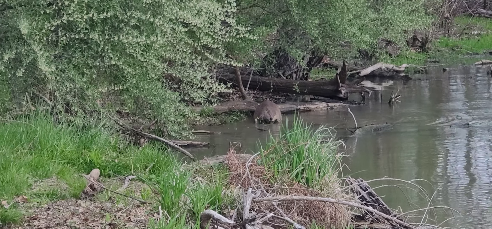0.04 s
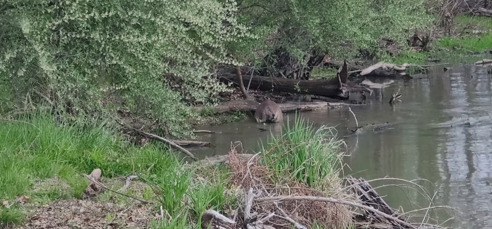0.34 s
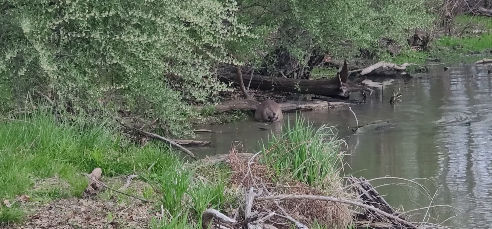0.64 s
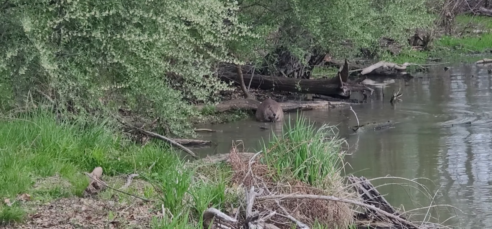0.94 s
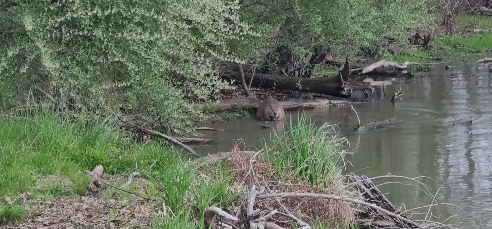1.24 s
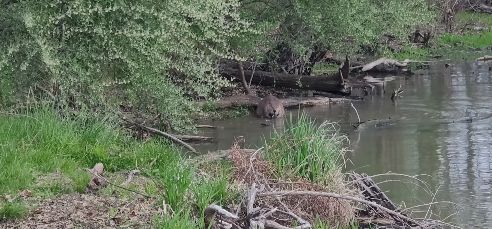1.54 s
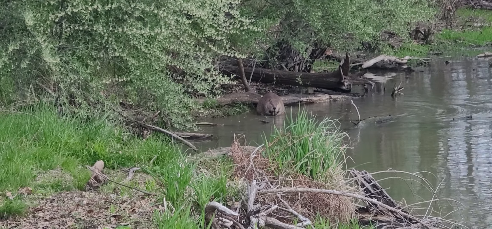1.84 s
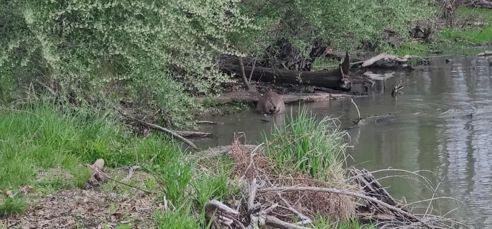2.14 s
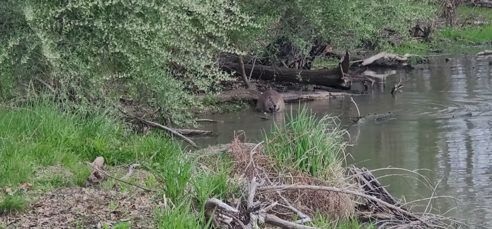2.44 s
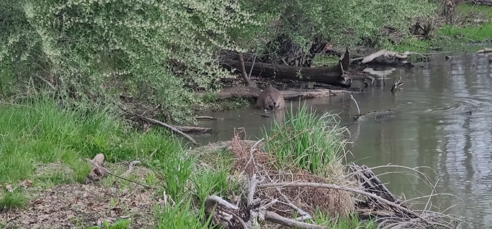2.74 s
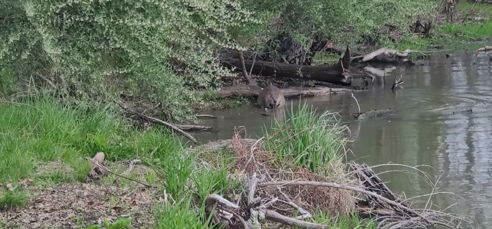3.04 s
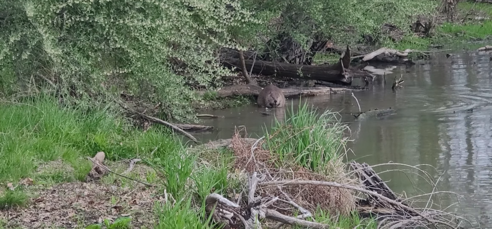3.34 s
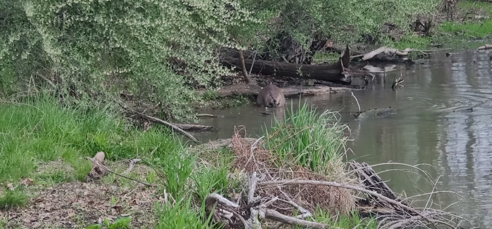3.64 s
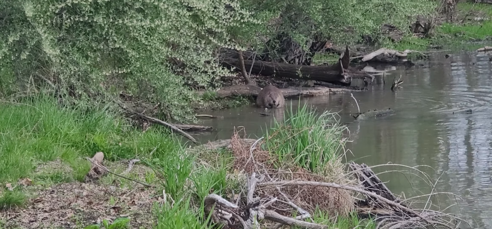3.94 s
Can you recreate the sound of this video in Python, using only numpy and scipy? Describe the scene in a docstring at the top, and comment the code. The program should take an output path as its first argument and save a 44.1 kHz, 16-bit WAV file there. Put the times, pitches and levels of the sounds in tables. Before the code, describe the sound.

Beaver teeth crack wood in quick little bites, with rumbling wind and birds around.

```python
"""A beaver gnaws on the far bank of a quiet river: about seven crisp bites a second, each a double
crack of wood fibre. A dove coos three times in near-pure tones, a songbird whistles and chirps, and
the banks give them all a short echo. Behind them sit far birds and a soft wash of water and leaves,
while wind buffets the two microphone ports with low rumble. Near the end a small camera motor,
probably the zoom, starts to whine on the left."""
import sys
import numpy as np
from scipy import signal
from scipy.fft import rfft, irfft
from scipy.io import wavfile
from scipy.ndimage import uniform_filter1d

SR = 44100
rng = np.random.default_rng(int(sys.argv[2]) if len(sys.argv) > 2 else 0)


def int16_out(signal):
    """Quantize to a 16-bit WAV file."""
    q = np.round(np.clip(np.atleast_2d(signal).T, -1, 1) * 32767)
    wavfile.write(sys.argv[1], SR, q.astype(np.int16))


N = 176400

# Bites: (time [s], level [dB], gap to second crack [s], second crack against first [dB],
# treble tilt [dB/octave], wood ring [Hz])
BITES = [(0.666, -51.5, 0.0026, -19, -1, 4400), (0.9102, -51.5, 0.005, -11, -5, 2680),
         (1.052, -60.5, .0015, 4, -3, 4270), (1.1898, -54, 0.0062, -6, -2, 4900),
         (1.337, -57.5, 0.0049, -1, -3, 3880), (1.5237, -62, 0.0075, -1, 1.5, 4930),
         (1.656, -64.5, .0075, 2, -5, 4540), (1.987, -57, .0028, -2, -1, 5000),
         (2.1238, -58, 0.0037, -7, 0, 4540), (2.3002, -54, 0.0068, -13, -3.5, 5370),
         (2.4428, -60, 0.0025, -6, 1, 5300), (2.5628, -58, 0.0067, 2, -1, 4900),
         (2.7085, -52, 0.0013, -14, 0, 5600), (2.8452, -53.5, 0.0055, -6, 0, 5500),
         (3.023, -61.5, 0.0073, -6, -3, 5800), (3.171, -61, 0.0026, -4, -3, 6040),
         (3.3027, -62.5, 0.0035, -4, 1, 5570)]
# Tone of a snapping fibre: (frequency [Hz], relative level [dB])
CRACK_EQ = [(500, -22), (1200, -10), (2200, -5), (3200, 2), (4200, -2), (5500, -2), (6800, -5), (8000, -20),
            (9500, -22), (11200, -16.5), (15500, -19)]
CRACK_RISE_S, CRACK_DECAY_S, SPLINTER_DECAY_S, SPLINTER_DB = 0.00017, 0.00086, 0.0054, -10
RING_DB, RING_WIDTH_HZ = 6.5, 510
BITE_PAN_DB, BITE_ECHO_DB = 6, -8  # every pan is left minus right

# Coos: (start [s], hold [s], pitch [Hz], level [dB], tail peak after the hold [s])
COOS = [(.05, 0.27, 494, -53, 0.088), (1.155, .27, 492, -53, 0.093), (2.035, 0.251, 486, -55, 0.12)]
COO_RISE_S, COO_FALL_S, COO_SAG_HZ_PER_S, COO_DROP_HZ = 0.073, 0.059, 13.4, 3.96
COO_TAIL_DB, COO_TAIL_S, COO_TAIL_SAG_HZ_PER_S, COO_ECHO_DB = -9.5, 0.058, 98, -14

# The songbird's falling whistle: (time [s], pitch [Hz], level [dB])
WHISTLE = [(1.36, 3600, -95), (1.44, 3200, -79), (1.485, 2990, -63.5), (1.53, 2670, -73),
           (1.555, 2600, -69), (1.585, 2380, -66), (1.62, 2120, -64.5), (1.65, 1970, -67)]
# Its chirps: (start [s], length [s], first pitch [Hz], last pitch [Hz], level [dB])
CHIRPS = [(1.903, 0.055, 3220, 3170, -71.5), (2.17, 0.063, 2130, 2540, -68.5),
          (2.214, 0.064, 2780, 2940, -70), (2.219, 0.058, 3160, 3140, -70.5),
          (2.403, 0.035, 2370, 2520, -77), (2.521, 0.03, 2250, 2510, -73), (2.586, 0.032, 2320, 2540, -74),
          (2.77, 0.032, 2280, 2450, -75.5), (2.942, 0.057, 2230, 2400, -76),
          (3.193, 0.078, 2450, 2193, -72), (3.654, 0.1, 5800, 6070, -85)]
BIRD_PAN_DB, BIRD_ECHO_DB = 7, -7

# Thin, buzzy calls: (centre [s], half length [s], pitch [Hz], width [Hz], level [dB], pan [dB])
LISPS = [(1.905, 0.033, 8500, 700, -89, 5), (3.212, .025, 6800, 600, -77, 1),
         (3.915, .035, 6300, 650, -73, -9)]
# Swells of a bird chorus blurred by distance: (time [s], level [dB])
CHORUS_FADER = [(0, -78.5), (.7, -84), (.9, -71), (1.15, -77), (1.8, -76.5), (2.1, -81.5), (2.9, -78.5),
                (3.3, -72), (3.7, -73), (4.0, -71.5)]
CHORUS_HZ, CHORUS_WIDTH_HZ, CHORUS_FLUTTER_DB = 2137, 220, 3

# Tone of the motor's hiss: (frequency [Hz], relative level [dB])
MOTOR_HISS_EQ = [(200, 10.5), (600, 11.5), (1400, 5.5), (3000, -8), (5000, -27), (7200, -11), (7900, 1),
                 (8400, -6), (9200, -43), (11000, -32), (15500, -17)]
MOTOR_START_S, MOTOR_RISE_S, MOTOR_HISS_DB, MOTOR_PAN_DB = 3.48, 0.049, -62, 34
WHINE_HZ, WHINE_DB = 7880, -74

# Gusts on the ports: (time [s], level [dB], pan [dB])
GUSTS = [(0, -17.5, -1), (.08, -37, -2.5), (.18, -36.5, -10), (.29, -42, -2), (.40, -34, -5),
         (.55, -46.5, -8.5), (.72, -38.5, -6.5), (.92, -41, -8), (1.0, -46.5, 6.5), (1.6, -48, 2),
         (1.77, -39, 8), (1.92, -42.5, -1.5), (2.2, -38.5, -7), (2.5, -46, -10.5), (2.75, -37.5, -5.5),
         (3.07, -44.5, -6), (3.2, -42.5, -9), (3.45, -45.5, -1.5), (4.0, -45.5, -1.5)]
# Tone of the wind rumble: (frequency [Hz], relative level [dB])
RUMBLE_EQ = [(10, -17.5), (25, -5.5), (40, 0), (62, -3.5), (80, -2.5), (100, -11), (130, -20), (200, -31),
             (400, -45.5), (1000, -97)]
# Single wind thumps: (centre [s], half length [s], pitch [Hz], left level [dB], right level [dB])
BUFFETS = [(.02, .028, 66.6, -11, -26), (0.168, 0.023, 67, -39, -31), (.40, 0.021, 72.2, -33, -28.5),
           (0.683, 0.017, 56.6, -29.5, -26.5), (0.759, 0.014, 56.5, -34, -17.5),
           (1.788, 0.026, 71, -34, -37), (2.944, 0.01, 58, -35, -21), (3.739, 0.017, 69.4, -45, -33)]

# Tone of the river and distant woods: (frequency [Hz], relative level [dB])
RIVER_EQ = [(88, -31), (150, -2.5), (221, -7), (320, -8.5), (462, -11), (736, -11), (1000, -20),
            (1370, -17.5), (1830, -22), (2180, -20), (2500, -25.5), (3040, -20), (3690, -30.5), (6110, -30),
            (6730, -31.5), (7560, -46.5), (9540, -49), (11100, -45), (15500, -45.5)]
# Slow swell of the wash: (time [s], level before RIVER_GAIN_DB [dB])
RIVER_FADER = [(0.1, -71.5), (0.47, -72.5), (3.41, -71.5), (3.55, -71), (3.95, -70)]
# Where each band of the wash sits: (frequency [Hz], pan [dB])
RIVER_PAN = [(150, 5), (640, 5), (1400, 3), (3100, 6), (6300, -1.5), (8000, 8), (10000, -1), (15000, 7.5)]
# How narrow its image is: (frequency [Hz], left-right correlation [0-1])
RIVER_CORRELATION = [(150, 0.77), (300, 0.96), (640, 0.38), (1400, 0.066), (15000, .05)]
RIVER_GAIN_DB, RIVER_PATCH_DB = 12, 0.91

# Echo of the trees and banks: (frequency [Hz], time to fall 60 dB [s])
ECHO_DECAY = [(200, 0.8), (1000, 0.61), (3000, 0.37), (8000, 0.081), (16000, 0.063)]
HIGH_CUT_HZ = 15750


def beaver():
    """The teeth snap fibres twice per bite; each crack rings the wood and trails off in splinters."""
    size, lead = 2048, 256  # samples; the lead leaves room for the EQ to ring ahead of the crack
    t, hz, out = np.arange(size) / SR, np.fft.rfftfreq(size, 1 / SR), np.zeros((2, N))
    decay = np.exp(-t / CRACK_DECAY_S) + amp(SPLINTER_DB) * np.exp(-t / SPLINTER_DECAY_S)
    envelope = (1 - np.exp(-t / CRACK_RISE_S)) * decay
    octaves = np.log2(np.maximum(hz, 1000) / 4500)  # the tilt pivots at 4500 Hz
    for s, db, gap, second_db, tilt_db, ring_hz in BITES:
        ring_db = RING_DB / (1 + ((hz - ring_hz) / RING_WIDTH_HZ) ** 2)
        colour = amp(at_hz(CRACK_EQ, hz) + tilt_db * octaves + ring_db)
        for onset, crack_db in ((s, db), (s + gap, db + second_db)):
            fibres = rng.standard_normal((2, size)) + 0.84 * rng.standard_normal(size)  # wide + centre
            crack = irfft(rfft(np.roll(fibres * envelope, lead)) * colour)
            crack *= np.linalg.norm(envelope) / np.linalg.norm(crack, axis=1, keepdims=True)
            add(out, onset - lead / SR, amp(crack_db) * crack)
    return out * pan(BITE_PAN_DB) + amp(BITE_ECHO_DB) * bank_echo(out.mean(0))


def dove():
    """Nearly pure coos that sag slowly, dip, and end in a soft falling tail."""
    out, t = np.zeros(N), np.arange(SR) / SR
    for s, hold, top_hz, db, tail_after in COOS:
        hz = top_hz - COO_SAG_HZ_PER_S * t - COO_DROP_HZ * np.minimum(t / hold, 1) ** 2
        hz -= COO_TAIL_SAG_HZ_PER_S * np.maximum(t - hold, 0)
        body = np.minimum(t / COO_RISE_S, 1) * np.clip((hold - t) / COO_FALL_S + .5, 0, 1)
        tail = amp(COO_TAIL_DB) * np.exp(-((t - hold - tail_after) / COO_TAIL_S) ** 2)
        add(out, s, amp(db) * (body + tail) * tone(hz))
    return out * pan(0.34) + amp(COO_ECHO_DB) * bank_echo(out)


def bird_note(hz, waver):
    """A whistled note whose pitch wavers by a small fraction."""
    drift = unit(uniform_filter1d(rng.standard_normal(N), size=200))[:len(hz)]
    return tone(hz * (1 + waver * drift))


def songbird():
    """One long falling whistle and a scatter of gliding chirps from the trees on the left."""
    out, t = np.zeros(N), np.arange(WHISTLE[0][0], WHISTLE[-1][0], 1 / SR)
    envelope = amp(curve(WHISTLE, t, column=2)) * signal.windows.tukey(len(t), .08)
    add(out, t[0], bird_note(curve(WHISTLE, t), waver=0.006) * envelope)
    for s, length, first_hz, last_hz, db in CHIRPS:
        hz = np.linspace(first_hz, last_hz, round(length * SR))
        add(out, s, amp(db) * bird_note(hz, waver=0.014) * np.hanning(len(hz)))
    return out * pan(BIRD_PAN_DB) + amp(BIRD_ECHO_DB) * bank_echo(out)


def far_birds():
    """High lisping calls over a faint, fluttering chorus deep in the woods."""
    flutter_db = CHORUS_FLUTTER_DB * unit(uniform_filter1d(rng.standard_normal(N), size=2500))
    out = noise_band(CHORUS_HZ, CHORUS_WIDTH_HZ) * amp(curve(CHORUS_FADER, T) + flutter_db)
    for s, half_length, hz, width_hz, db, pan_db in LISPS:
        out += amp(db) * pan(pan_db) * noise_band(hz, width_hz) * swell(s, half_length)
    return out


def lens_motor():
    """A small motor close to the left port: a thin, steady whine in a bed of hiss."""
    whine = amp(WHINE_DB) * np.sqrt(2) * np.sin(2 * np.pi * WHINE_HZ * T)
    hiss = amp(MOTOR_HISS_DB) * noise(MOTOR_HISS_EQ)
    fade_in = np.clip((T - MOTOR_START_S) / MOTOR_RISE_S, 0, 1)
    return (whine + hiss) * fade_in * amp([[0], [-MOTOR_PAN_DB]])


def wind():
    """Separate low turbulence at each port, with a few thumping buffets."""
    rumble = np.array([noise(RUMBLE_EQ), noise(RUMBLE_EQ)])
    out = rumble * amp(curve(GUSTS, T)) * pan(curve(GUSTS, T, column=2))
    for s, half_length, hz, left_db, right_db in BUFFETS:
        phase = rng.random() + 0.11 * rng.standard_normal((2, 1))  # cycles, a little apart at each port
        thump = swell(s, half_length) * np.sin(2 * np.pi * (hz * (T - s) + phase))
        out += amp([[left_db], [right_db]]) * thump
    return out


def river():
    """A soft wash of water and leaves with drifting patches, narrow in the lows and wide on top."""
    frames, hz = N // 256 + 5, np.fft.rfftfreq(1024, 1 / SR)
    draws = rng.standard_normal((5, len(hz), frames))
    left, spread = draws[0] + 1j * draws[1], draws[2] + 1j * draws[3]
    patches = uniform_filter1d(draws[4], size=10, axis=0)  # smeared across frequency
    patches = unit(uniform_filter1d(patches, size=14, axis=1))  # then across time
    correlation = at_hz(RIVER_CORRELATION, hz)[:, None]
    right = correlation * left + np.sqrt(1 - correlation ** 2) * spread
    colour = amp(at_hz(RIVER_EQ, hz)[:, None] + RIVER_PATCH_DB * patches)
    spectra = np.array([left, right]) * colour * pan(at_hz(RIVER_PAN, hz))[:, :, None]
    wash = signal.istft(spectra, nperseg=1024, noverlap=768)[1][:, :N]
    return unit(wash) * amp(RIVER_GAIN_DB + curve(RIVER_FADER, T))


def bank_echo(x):
    """Trees and banks scatter a diffuse stereo tail whose treble dies first."""
    hz, t, spectra = signal.stft(rng.standard_normal((2, SR)), SR, nperseg=256)
    decay = amp(-60 * t / at_hz(ECHO_DECAY, hz)[:, None])
    tail = signal.istft(spectra * decay, SR, nperseg=256)[1]
    return signal.fftconvolve(x[None], tail / np.linalg.norm(tail[0]), axes=1)[:, :N]


def tone(hz):
    """A sine at rms 1 that follows a pitch curve."""
    return np.sqrt(2) * np.sin(2 * np.pi * np.cumsum(hz) / SR)


def noise(eq):
    """Steady noise at rms 1, shaped by an EQ curve."""
    colour = amp(at_hz(eq, np.fft.rfftfreq(N, 1 / SR)))
    return unit(irfft(rfft(rng.standard_normal(N)) * colour, N))


def noise_band(hz, width_hz):
    """A narrow band of noise, separate in each channel."""
    colour = np.exp(-((np.fft.rfftfreq(N, 1 / SR) - hz) / width_hz) ** 2)
    return unit(irfft(rfft(rng.standard_normal((2, N))) * colour, N))


def swell(centre_s, half_length_s):
    """A bell-shaped fade in and out."""
    return np.exp(-((T - centre_s) / half_length_s) ** 2)


def amp(db):
    """Decibels to gain."""
    return 10 ** (np.asarray(db) / 20)


def unit(x):
    """Scales to rms 1."""
    return x / np.sqrt(np.mean(x ** 2) + 1e-30)


def at_hz(points, hz):
    """Reads a table on a log-frequency axis."""
    f, value = np.transpose(points)
    return np.interp(np.log(hz + 1), np.log(f + 1), value)


def curve(rows, t, column=1):
    """Reads one column of a time table as an automation curve."""
    rows = np.array(rows)
    return np.interp(t, rows[:, 0], rows[:, column])


def pan(db):
    """Left and right gains for a level difference."""
    return amp(np.array([[.5], [-.5]]) * db)


def add(mix, s, sound):
    """Drops a sound into the mix at s seconds."""
    part = mix[..., max(round(s * SR), 0):][..., :sound.shape[-1]]
    part += sound[..., :part.shape[-1]]


def scene():
    """The stereo mix at the two ports."""
    return beaver() + dove() + songbird() + far_birds() + river() + wind() + lens_motor()


def record(dry):
    """A steep high cut takes off the topmost air."""
    high_cut = signal.firwin(511, HIGH_CUT_HZ, window=("kaiser", 9), fs=SR)
    return signal.oaconvolve(dry, high_cut[None], "same")


T = np.arange(N) / SR
dry = scene()
out = record(dry)
int16_out(out)
```